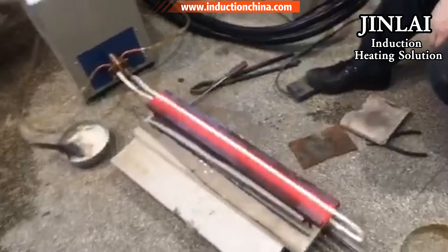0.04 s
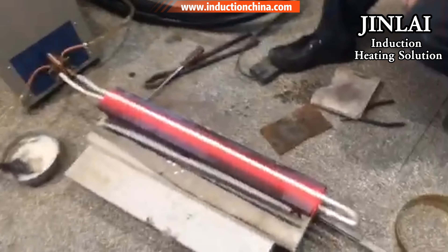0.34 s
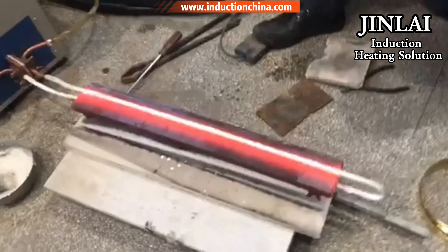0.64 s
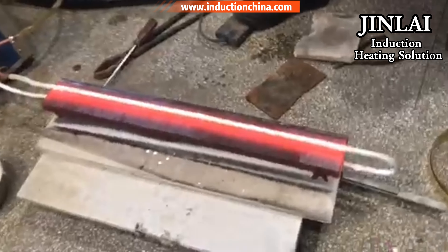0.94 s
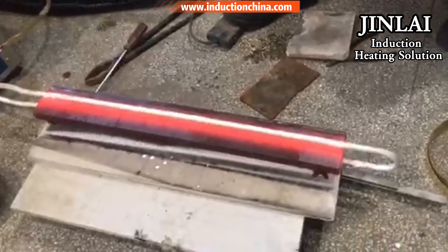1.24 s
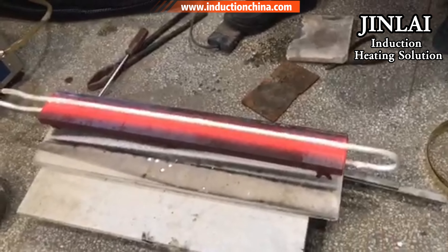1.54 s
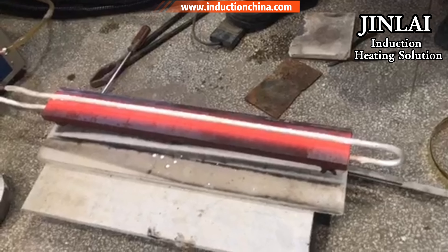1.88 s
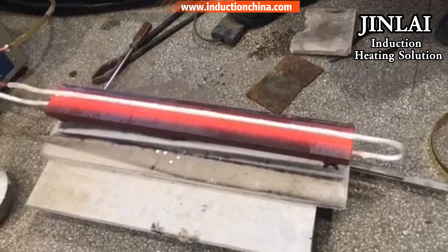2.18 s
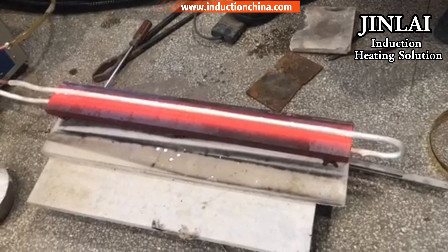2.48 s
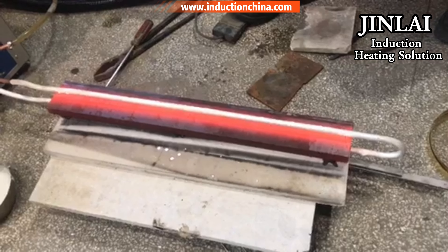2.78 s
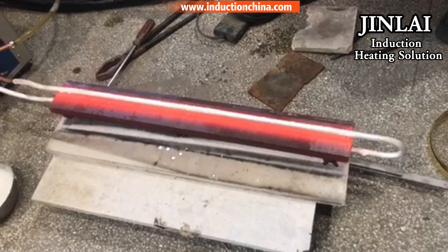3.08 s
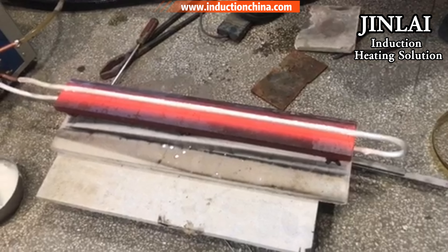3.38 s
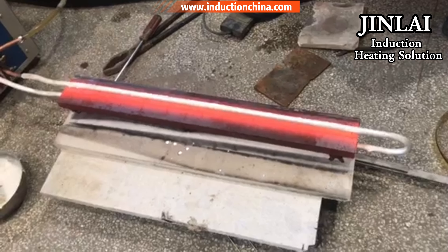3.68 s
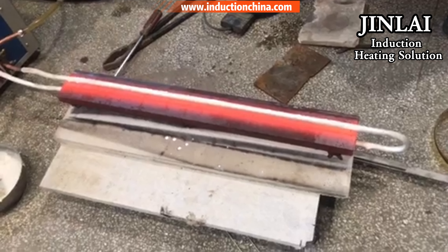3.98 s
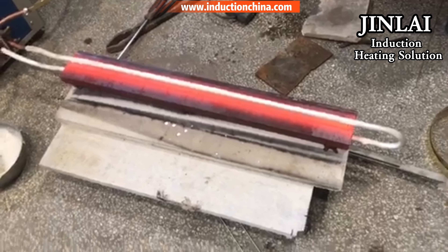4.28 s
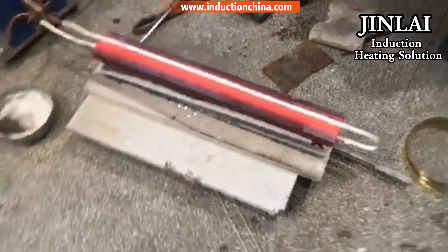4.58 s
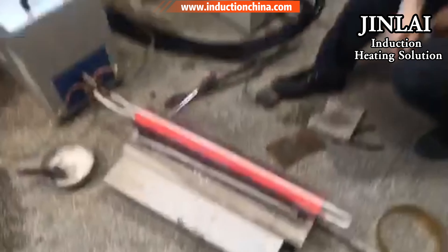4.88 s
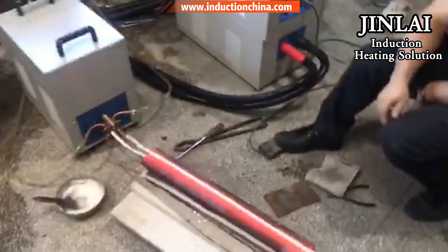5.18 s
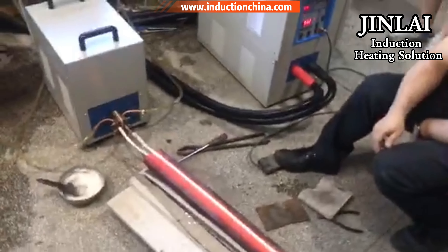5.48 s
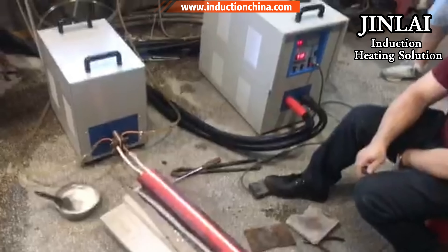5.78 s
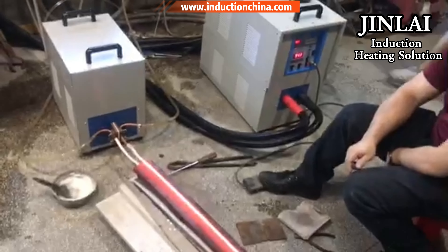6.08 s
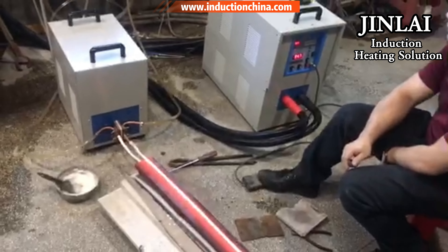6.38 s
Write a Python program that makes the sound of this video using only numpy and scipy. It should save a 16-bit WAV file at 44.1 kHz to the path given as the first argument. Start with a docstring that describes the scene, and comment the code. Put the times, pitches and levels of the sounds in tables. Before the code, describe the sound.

An induction heater whines and drones softly in a workshop, then a jet of air cuts in with repeated sharp hisses.

```python
"""A jet of compressed air opens after a second and hisses in uneven bursts, ringing the edges and
hollows it sweeps over. Behind it an induction heater keeps a bar glowing: its inverter whines, rippled
by the mains, over a droning pump and fans. One hand-held microphone moves slowly through the
hard-walled workshop, so the tones swell and fade and the reflections comb the hiss."""
import sys
import numpy as np
from scipy import signal
from scipy.fft import rfft, irfft, next_fast_len
from scipy.io import wavfile

SR = 44100
rng = np.random.default_rng(int(sys.argv[2]) if len(sys.argv) > 2 else 0)


def materialize(psi):
    """Save the field psi as 16-bit PCM at rate SR to the path in sys.argv[1].

    A 1-D psi becomes a single channel; in a 2-D psi each row is a channel.
    """
    bounded = np.clip(np.atleast_2d(psi).T, -1, 1)
    quanta = np.round(bounded * 32767).astype(np.int16)
    wavfile.write(sys.argv[1], SR, quanta)


N = 284004
TIME = np.arange(N) / SR


def air_jet(level_db=0.8, leak_db=-38, flutter_db=0.28, flicker_rate=14):
    """Big eddies rush on surfaces, small ones sizzle at the nozzle, the shortest waves form a beam."""
    # colour of the hiss: f/Hz, relative density/dB
    spectrum = [(400, -18.5), (800, -12.5), (1300, -8.5), (2000, -5.5), (2700, -1), (3600, 0),
                (4500, -0.76), (6200, -1.46), (8700, -3.5), (11500, -6), (13500, -7.5), (15600, -8.5)]
    # bursts of air: start/s, attack/s, length/s, level/dB, sizzle/dB, beam towards the microphone/dB
    bursts = [(1.082, 0.02, 0.041, -28, 2.5, 5), (1.132, 0.014, 0.23, -25.5, 0.5, -1.5),
              (1.376, 0.079, 0.15, -27.5, 2.5, -2.5), (1.566, 0.095, 0.15, -27.5, 5.5, -2),
              (1.739, 0.08, 0.3, -28, -1.5, 2), (1.988, 0.063, 0.057, -26, 3, -3),
              (2.355, 0.022, 0.035, -33.5, 7, 8), (2.384, 0.094, 0.13, -26, 3, 0),
              (2.508, 0.047, 0.39, -28.0, -2, 3.5), (2.944, 0.056, 0.1, -28, 0.5, 7.5),
              (3.038, 0.04, 0.082, -26, 1.5, 2), (3.218, 0.035, 0.094, -29, 1.5, 4),
              (3.33, 0.063, 0.11, -29.5, 0.5, 3), (3.428, 0.034, 0.059, -26.5, 0.5, 8.5),
              (3.513, 0.094, 0.33, -27.5, 1, 4), (3.737, 0.12, 0.25, -28.5, 1.5, -1),
              (4.205, 0.057, 0.24, -35, 7, 5), (4.383, 0.1, 0.11, -28, 7, 0),
              (4.602, 0.075, 0.12, -28, 3.5, 4), (4.793, 0.075, 0.139, -26.5, 2.5, -0.5),
              (5.03, 0.137, 0.267, -26, 0.5, 1), (5.294, 0.041, 0.371, -26.0, 0.0, 0),
              (5.716, 0.11, 0.22, -25, -1.0, -1.0), (5.931, 0.096, 0.19, -24.5, 1.5, -2.5),
              (6.133, 0.091, 0.2, -25.0, -1.5, 0), (6.346, 0.078, 0.085, -24.5, -1, 2)]
    # bands of eddies (rush, body, sizzle, beam); the more a burst sizzles, the less it rushes:
    # release/(dB/s), share of the sizzle, share of the beam, leak lift/dB, flicker/dB
    eddies = [(92, -0.58, 0.29, 3, 0.8), (76, -0.12, 0, 0, 0.66), (96, 0.91, 0, 0, 0.87),
              (114, 1, 0.98, 2.5, 1.5)]
    # crossovers between the bands: f/Hz
    crossovers = [2170, 6900, 11800]
    hiss = noise(lambda hz: from_db(at_hz(spectrum, hz)) * hz / (hz + 100))
    highs = [hiss] + [above(hiss, hz) for hz in crossovers] + [0]
    out = np.zeros(N)
    for k, (release, sizzle_share, beam_share, lift_db, flicker_db) in enumerate(eddies):
        power = from_db(leak_db + lift_db) ** 2  # the open valve leaks between bursts
        for start_s, attack_s, length_s, db, sizzle_db, beam_db in bursts:
            gain = from_db(db + sizzle_share * sizzle_db + beam_share * beam_db)
            power += (gain * burst_envelope(start_s, attack_s, length_s, release)) ** 2
        band = highs[k] - highs[k + 1]
        out += band * np.sqrt(power) * from_db(flicker_db * drift(flicker_rate))
    return out * from_db(level_db + flutter_db * drift(130))


def burst_envelope(start_s, attack_s, length_s, release_db_per_s):
    """A burst rises, holds, and dies away in the room."""
    age = TIME - start_s
    return np.clip(age / attack_s, 0, 1) * from_db(-release_db_per_s * np.maximum(age - length_s, 0))


def ringing_edges():
    """Edges and hollows ring as the jet sweeps over them."""
    # resonances: centre t/s, half length/s, f/Hz, width/Hz, level/dB
    edges = [(1.19, 0.068, 4300, 260, -31.5), (1.71, 0.069, 4260, 320, -33), (1.875, 0.031, 1920, 500, -36),
             (1.875, 0.032, 1190, 500, -41), (2.08, 0.047, 2920, 1000, -34.5), (2.68, 0.12, 2500, 400, -39),
             (2.7, 0.055, 3450, 400, -35), (3.78, 0.15, 3320, 250, -41), (4.70, 0.058, 3360, 400, -36),
             (4.885, 0.04, 3770, 520, -26.5), (5.24, 0.032, 2800, 110, -32), (5.4, 0.14, 9000, 700, -35.5),
             (6.25, 0.036, 4580, 400, -32), (6.2, 0.23, 6740, 900, -36)]
    return blown(edges)


def blown(rows):
    """Turbulence rings a resonance for as long as the air passes over it."""
    out = np.zeros(N)
    for centre_s, half_s, hz, width_hz, db in rows:
        radius = np.exp(-np.pi * width_hz / SR)
        poles = [1, -2 * radius * np.cos(2 * np.pi * hz / SR), radius * radius]
        ring = signal.lfilter([1, 0, -1], poles, rng.standard_normal(N))
        out += from_db(db) * rms_one(ring) * bump(centre_s, half_s)
    return out


def reflections(x, share=0.19, sway_s=.00015):
    """Nearby surfaces comb the sound, and the combs slide as nozzle and hand move."""
    # bounces off floor, cabinet and wall: delay/s
    bounces = [.0022, .0047, .0083]
    out = x.copy()
    for delay_s in bounces:
        late = np.round(np.arange(N) - SR * (delay_s + sway_s * drift(.7))).astype(int)
        out += share * x[np.clip(late, 0, N - 1)]
    return out / np.sqrt(1 + len(bounces) * share ** 2)


def inverter(whine_hz=1763.3, mains_hz=49.1, level_db=-0.6, sideband_db=-3.0, odd_db=-3.5, upper_db=1.0):
    """Mains ripple puts sidebands round the whine's partials; each fades in the room's standing waves."""
    # partials of the whine: multiple, level/dB, sideband reach/Hz, share of the swell
    partials = [(1, -56, 60, 0.5), (2, -49.5, 130, 1), (3, -58.5, 100, 0.1), (4, -62.5, 290, 0),
                (5, -75, 150, 0), (7, -70, 150, 0)]
    # swell as the microphone moves: t/s, level/dB
    swell = [(0, -3), (.2, 2.5), (.36, -5), (.55, 3), (.75, 0.5), (1.1, 2), (2.3, -5), (3.5, -3.5),
             (6.44, 6)]
    # one sideband flares briefly: centre t/s, half length/s, multiple, mains steps above it, lift/dB
    flare = (0.48, 0.046, 2, 2, 11.6)
    swell_db, = in_time(swell)
    flare_s, half_s, flare_multiple, flare_step, flare_db = flare
    out = np.zeros(N)
    for multiple, db, reach_hz, share in partials:
        gain = from_db(db + level_db + share * swell_db)
        for step in np.arange(-6, 7):
            offset_hz = step * mains_hz
            if abs(offset_hz) > 3 * reach_hz:
                continue
            # rectified mains ripples mostly at twice its rate, so the even sidebands lead;
            # pitch and strength ripple together, so the upper ones are the louder
            ripple_db = sideband_db * (step != 0) + odd_db * (step % 2) + upper_db * np.sign(step)
            if (multiple, step) == (flare_multiple, flare_step):
                ripple_db += flare_db * bump(flare_s, half_s)
            line = tone(multiple * whine_hz + offset_hz, wander_hz=2.38, waver_db=3.5, rate=21.4)
            out += gain * from_db(ripple_db) * np.exp(-abs(offset_hz) / reach_hz) * line
    return out


def machines(pump_hz=42.8, air_db=-44.5, drone_db=-1.5):
    """The pump throbs and the cabinets rumble, louder or softer as the microphone moves among them."""
    # level rides: t/s, pump throb/dB, its octave/dB, cabinet rumble/dB (taken about its mean)
    nearness = [(0.0, -55, -61, -45.5), (0.07, -48, -43, -45), (0.16, -47, -56.5, -44.5),
                (0.9, -46.5, -53.5, -45), (1.16, -51, -65, -47), (1.79, -54, -51, -50),
                (2.37, -50.5, -62, -47.5), (5.11, -54, -58.5, -46.5), (6.22, -53, -47.5, -46.5),
                (6.44, -53, -57, -48.5)]
    throb_db, octave_db, rumble_db = in_time(nearness)
    throb = from_db(throb_db) * tone(pump_hz, wander_hz=0.83, waver_db=1.0, rate=5.7)
    octave = from_db(octave_db) * tone(2 * pump_hz, wander_hz=0.75, waver_db=1.9, rate=4.4)
    rumble = from_db(drone_db) * drone() + from_db(air_db) * cooling_air()
    return throb + octave + from_db(rumble_db - rumble_db.mean()) * rumble


def drone(turn_s=(4.2, 4.7)):
    """Pump, fans and cabinets hum; the balance shifts as the microphone turns to the cabinets."""
    # hum tones: f/Hz, level/dB, waver/dB, change with the turn/dB
    hums = [(129.2, -59, 1.5, -5), (172, -63.5, 3, 3.5), (200, -57, 3.5, 4.5), (247, -64, 16, 0),
            (261.4, -57.5, 3, -7), (298.6, -55.5, 3.5, 4), (330.5, -57.5, 0.5, -11), (419, -65, 9, -2),
            (580, -62, 2, -0.5)]
    turned = np.interp(TIME, turn_s, [0, 1])
    return sum(from_db(db + turn_db * turned) * tone(hz, wander_hz=2.58, waver_db=waver_db, rate=7.1)
               for hz, db, waver_db, turn_db in hums)


def cooling_air():
    """Air rushes through the cabinets and lays a dark bed of noise under the workshop."""
    # colour of the bed: f/Hz, relative density/dB
    spectrum = [(25, -22), (45, 6), (75, -0.5), (140, -5.5), (220, -1.5), (320, -0.5), (480, -6),
                (900, -6.5), (1600, -10.5), (3000, -12), (6000, -18.5), (9000, -21.5), (12700, -22),
                (15600, -31)]
    return noise(lambda hz: from_db(at_hz(spectrum, hz)) * hz ** 4 / (hz ** 4 + 18 ** 4))


def fan(note_hz=628):
    """A fan sings one note that swells and fades in the room's standing waves."""
    # level ride of the note: t/s, level/dB
    swell = [(0, -71), (.5, -65), (.75, -55.5), (3.0, -55), (4.3, -53.5), (4.8, -57), (5.1, -64),
             (5.65, -70), (5.85, -54), (6.44, -64)]
    note_db, = in_time(swell)
    return from_db(note_db) * tone(note_hz, wander_hz=0.42, waver_db=3.5, rate=1.68)


def faint_puffs():
    """Brief, airy puffs sound before the jet opens."""
    # puffs: centre t/s, half length/s, f/Hz, width/Hz, level/dB
    puffs = [(.385, 0.02, 9000, 2500, -49), (.385, .022, 14500, 3000, -53), (.53, .05, 4600, 1500, -51)]
    return blown(puffs)


def tone(hz, wander_hz, waver_db, rate):
    """A sine of unit power whose pitch wanders and whose level sways within bounds."""
    phase = 2 * np.pi * (rng.random() + np.cumsum(hz + wander_hz * drift(rate)) / SR)
    return rms_one(np.sin(phase) * from_db(2 * waver_db * np.tanh(drift(rate) / 2)))


def drift(rate, hop=100):
    """Smooth random motion of spread 1 that changes about rate times a second."""
    pole = np.exp(-2 * hop * np.pi * rate / SR)
    slow = signal.lfilter([1], [1, -2 * pole, pole * pole], rng.standard_normal(N // hop + 1002))[1000:]
    return np.interp(np.arange(N) / hop, np.arange(len(slow)), rms_one(slow))


def bump(centre_s, half_s):
    """A bell-shaped fade in and out."""
    return np.exp(-.5 * ((TIME - centre_s) / half_s) ** 2)


def noise(gain_at):
    """Coloured noise of unit power."""
    return rms_one(shaped(rng.standard_normal(N), gain_at))


def above(x, edge_hz):
    """The part of a sound above a soft crossover."""
    return shaped(x, lambda hz: 1 - 1 / (1 + (hz / edge_hz) ** 8))


def shaped(x, gain_at):
    """Filter by a gain given as a function of frequency."""
    size = next_fast_len(N + SR // 10)
    hz = np.arange(size // 2 + 1) * SR / size
    return irfft(rfft(x, size) * gain_at(hz), size)[:N]


def at_hz(points, hz):
    """A spectrum read on a log-frequency axis."""
    knots, db = np.transpose(points)
    return np.interp(np.log(hz + 1e-9), np.log(knots), db)


def in_time(rows):
    """Each column of a curve at every sample."""
    times, *columns = np.transpose(rows)
    return [np.interp(TIME, times, column) for column in columns]


def from_db(db):
    """Decibels to gain."""
    return 10 ** (np.asarray(db) / 20)


def rms_one(x):
    """Scale to unit power."""
    return x / np.sqrt(np.mean(x ** 2) + 1e-20)


def scene(valve_opens_s=1.0844, valve_travel_s=0.016):
    """The valve lets the jet in over the running heater; both channels are alike."""
    valve = np.clip((TIME - valve_opens_s) / valve_travel_s, 0, 1)
    jet = reflections(valve * (air_jet() + ringing_edges()))
    sound = jet + faint_puffs() + inverter() + machines() + fan()
    return np.array([sound, sound])


def record(dry, cutoff_hz=15820):
    """The microphone port cuts hollows into the treble; the top is cut steeply."""
    # three dips and a slight peak of the port: f/Hz, width/Hz, gain/dB
    port = [(4970, 200, -3.5), (7750, 310, -4), (10480, 570, -5), (13400, 700, 1)]

    def response(hz):
        port_db = sum(db / (1 + (2 * (hz - centre_hz) / width_hz) ** 2)
                      for centre_hz, width_hz, db in port)
        return from_db(port_db) * np.clip((cutoff_hz - hz) / 80, 0, 1)
    return np.array([shaped(channel, response) for channel in dry])


dry = scene()
out = record(dry)
materialize(out)
```